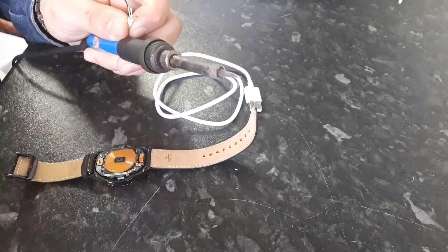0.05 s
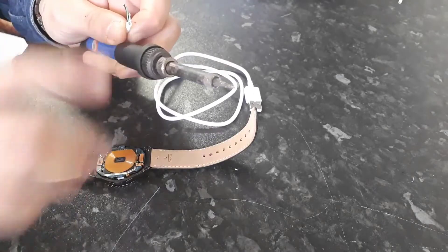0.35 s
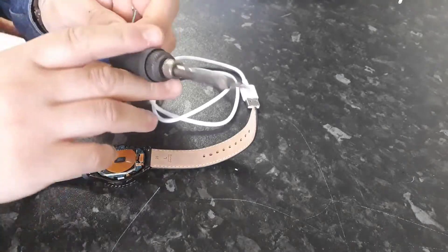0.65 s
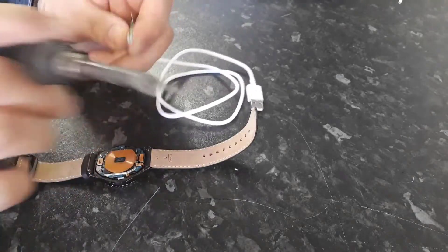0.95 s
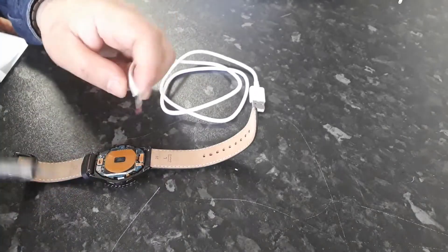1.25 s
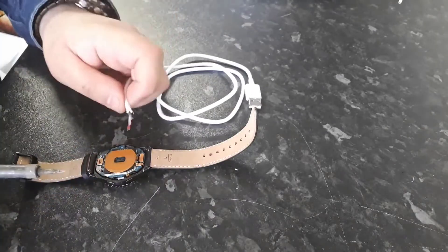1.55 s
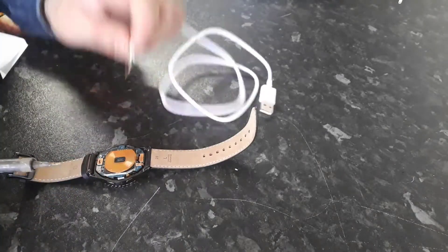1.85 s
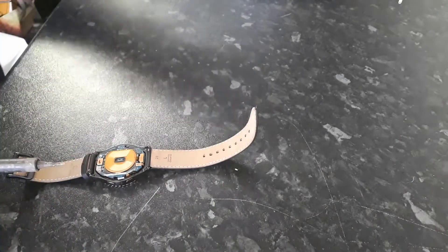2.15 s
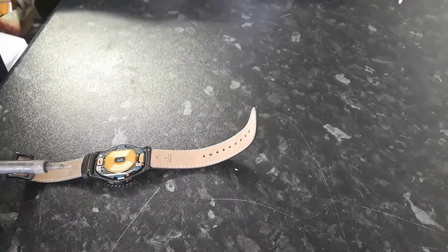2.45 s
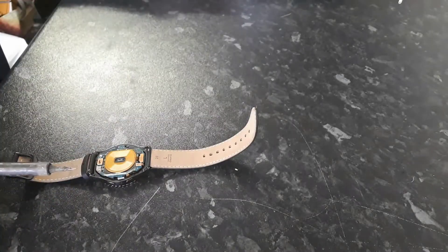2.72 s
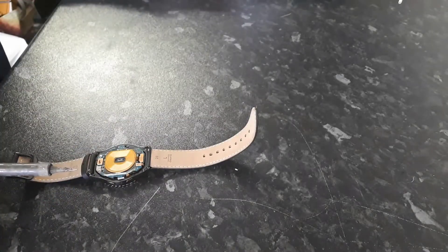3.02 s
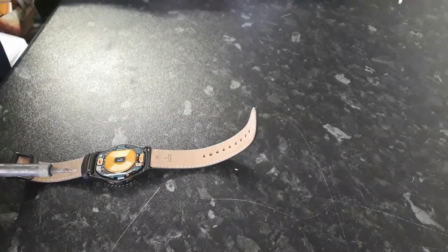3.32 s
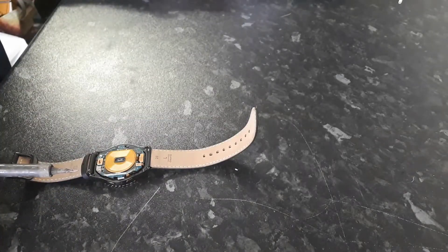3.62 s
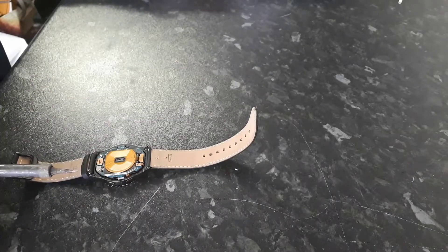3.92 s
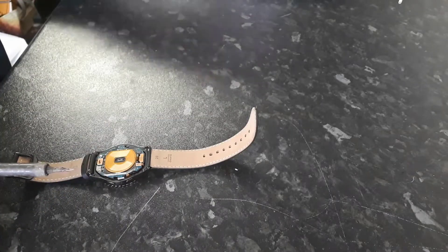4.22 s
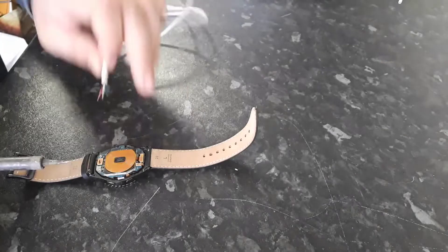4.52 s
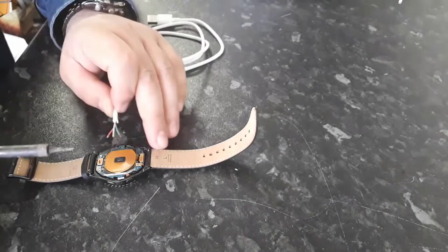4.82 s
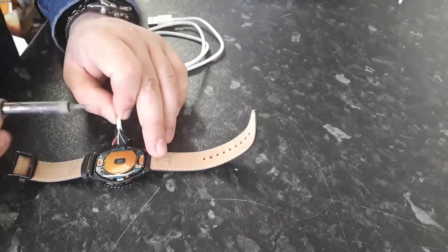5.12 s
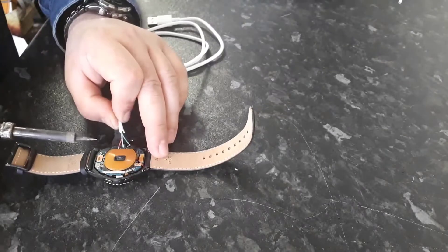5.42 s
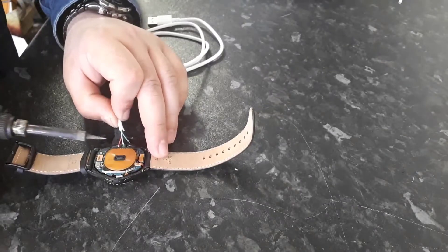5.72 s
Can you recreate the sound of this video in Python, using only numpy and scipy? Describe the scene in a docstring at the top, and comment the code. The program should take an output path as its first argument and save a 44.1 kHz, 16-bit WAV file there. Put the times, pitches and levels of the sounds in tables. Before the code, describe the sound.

A hand tool clacks against a countertop, followed by a cable's brief scrape, plug taps and light rustling in a quiet, humming room.

```python
"""Small tools on a hard countertop in a quiet room. First a hand and tool knock on it, exciting the
modes of top and shaft; then the hand brushes along it. Near 1.8 s a coiled cable slides away by
stick-slip friction, and at 2.2 s it is put down, its plug bouncing in short impacts. From about 4 s it
is picked up with taps, rubs and squeaks, and the hand bumps the top softly. A faint whistle comes and
goes late on; under it all lie room noise, a thin hiss and the harmonic drone of two far engines."""
import sys
import numpy as np
from scipy import signal
from scipy.fft import rfft, irfft
from scipy.io import wavfile

SR = 44100
rng = np.random.default_rng(int(sys.argv[2]) if len(sys.argv) > 2 else 0)


def int16_out(signal):
    """Quantize to a 16-bit WAV file."""
    q = np.round(np.clip(np.atleast_2d(signal).T, -1, 1) * 32767)
    wavfile.write(sys.argv[1], SR, q.astype(np.int16))


N = 258360
TIME = np.arange(N) / SR

# blows: t/s, level/dB, thud/dB, clack/dB, edge/dB, rattle decay/s, contact f/Hz, contact gain/dB
KNOCKS = [(0.126, -24, -12, -10, -18.5, 0.013, 1360, 5.5),
          (0.221, -21, -8.5, -9.5, -10.5, 0.0044, 1320, 4.5),
          (0.253, -14, -5.5, -30, -36.5, 0.0082, 576, 2.5), (0.259, -11.5, -8, -13, -29, 0.01, 1400, 1.5),
          (0.2645, -20, -11, -12, -31.5, 0.0034, 1294, 8.5), (0.3085, -21, -7.5, 1.5, -9, 0.015, 1850, 1.5)]
# spectrum of a knock: f/Hz, level/dB
KNOCK_SPECTRUM = [(60, -35.5), (115, 0.5), (175, -2), (270, 5), (560, -5), (760, -1.5), (1300, -5),
                  (1950, -9), (2350, -15), (3200, -25.5), (4400, -19), (5000, -21), (6000, -26.5),
                  (7600, -27.5), (13000, -33.5), (16000, -43.5)]
# modes of the countertop and what stands on it: f/Hz, level/dB, T60/s
TOP_MODES = [(125, -10, .3), (178, -7, .27), (217, -10, .22), (250, -11, .12), (360, -3.5, .13),
             (495, -9, .06), (545, 0, .09), (619, -5, .06), (705, -11.5, .08), (875, -8, .13),
             (988, -8, .14), (1025, -6, .1), (1290, -7, .09), (1330, -3, .07), (1674, -6, .09),
             (1940, -2, .06), (2470, -7, .07), (4480, 5, .018), (5000, 4, .017), (7600, 4, .015)]
# the knocks lean to the right: f/Hz, left minus right/dB
KNOCK_BALANCE = [(130, -1), (380, -3), (900, -6), (1400, -5), (2000, -4), (2700, -1), (5000, 1),
                 (14000, -1)]
def knocks():
    """Impact excitation: heavy, dull blows of hand and tool set the countertop ringing."""
    return impacts(KNOCKS, KNOCK_SPECTRUM, TOP_MODES, KNOCK_BALANCE,
                   ring_db=8, rattle_db=11, trim_db=[17.4, 13.3, 17.8, 17.7], detune=0)

# hard blows on the tool's metal shaft: t/s, level/dB
SHAFT_STRIKES = [(.2215, -33), (.2592, -43), (.3087, -26)]
# modes of the shaft: f/Hz, level/dB, T60/s
SHAFT_MODES = [(3750, -11, .03), (4450, -11, .035), (5030, 0, .021), (5950, -16, .05), (7400, -16, .07),
               (8150, -14, .04)]
def shaft_ring(left_lag_s=.00003):
    """Free vibration: the struck shaft rings briefly, and the sound reaches the left side later."""
    return np.array([sum(damped_mode(s + lag, hz, db + level, t60)
                         for s, db in SHAFT_STRIKES for hz, level, t60 in SHAFT_MODES)
                     for lag in (left_lag_s, 0)])

# spectrum of the skid: f/Hz, level/dB
SKID_SPECTRUM = [(300, -15.5), (600, -1), (1000, 2), (1700, 4.5), (2100, -4.5), (2700, -14), (3600, -9),
                 (5000, -13), (5700, -16.5), (7500, -14.5), (9000, -19), (13000, -20), (15000, -31.5)]
# resonances of the skidding shaft: f/Hz, width/Hz, gain/dB
SKID_PEAKS = [(3480, 220, 11), (4400, 220, 11), (5030, 150, 8)]
def tool_skid():
    """Sliding friction: after the second knock the tool skids, and its shaft sings faintly."""
    friction = coloured(slips(2500, 1.5), SKID_SPECTRUM, 0.13, SKID_PEAKS)
    return friction * amp(-39.5) * window(0.228, 0.27, 0.0015, 0.0036)

# plug and cable taps: t/s, level/dB, thud/dB, hardness/dB, rattle decay/s, contact f/Hz, contact gain/dB
TAPS = [(2.2147, -55.5, -20, 9, 0.0039, 2500, 0), (2.2177, -42, -13, 4, .003, 3710, -1),
        (2.221, -41.5, 3.5, -23, 0.0024, 1080, 13), (2.228, -26.5, -7, -9, 0.0022, 2160, 2),
        (2.2885, -35.5, -3, 0.5, 0.0054, 3430, -2), (2.296, -48, -5, 2, .002, 3430, -8),
        (2.348, -36, -24, 0, 0.0026, 1430, 5), (2.391, -37.5, -32, -1, 0.0029, 1800, 9),
        (2.399, -43.5, -36, -6.5, 0.004, 1900, 3), (2.575, -40, -18, 0.5, 0.0049, 2500, 0),
        (2.668, -48, -7, -1, 0.0033, 2410, 10.5), (2.712, -48, -4, -8, 0.0089, 815, 9),
        (3.939, -49, -5, -37, 0.0036, 950, 1), (4.16, -51.5, -17.5, -30.5, 0.0095, 1030, 9),
        (4.253, -45, -13, -11.5, 0.0081, 1870, 10), (4.263, -46, -32, -10, 0.0051, 1420, 7),
        (4.348, -48.5, -27, -2, 0.0046, 1380, -4), (4.367, -53, -38, -3, 0.0067, 1810, 11),
        (4.438, -42.5, -27, 0, 0.0034, 1420, 5), (4.468, -38.5, -12, -2, 0.0034, 584, 20),
        (4.49, -33.5, -15.5, 0, 0.0043, 2320, 1), (4.4995, -45.5, -17, 2, 0.0036, 2790, 3),
        (4.507, -48, -29, 0.5, 0.0024, 1600, -6), (4.529, -38.5, -17, -7, 0.0062, 593, 18.5),
        (4.593, -39.5, -20, 0.5, 0.0058, 2180, 3), (4.686, -45, -21, -0.5, 0.0029, 3250, 6),
        (4.691, -47, -17, -2, 0.0023, 2100, 10), (4.697, -55, -20, -0.5, 0.002, 1590, 6),
        (4.711, -51, -15, -4, 0.002, 1750, 5), (4.731, -53.5, -18, -0.5, 0.0017, 2630, 4),
        (4.785, -54.5, -15, -3, 0.0025, 2150, 11), (4.8, -50.5, -34, -6, 0.0098, 973, 14),
        (4.953, -51, 2, -13, 0.0061, 1690, 5)]
# spectrum of a tap: f/Hz, level/dB
TAP_SPECTRUM = [(110, -30), (230, 8), (380, -2.5), (590, -9.5), (730, -4.5), (960, 1), (1180, -4),
                (2100, -4.5), (2650, -5), (3400, -5), (5800, -18), (7600, -18.5), (9600, -29), (13300, -29),
                (16000, -68)]
# modes of the plug on the top, damped by its cable: f/Hz, level/dB, T60/s
PLUG_MODES = [(236, -19, .12), (330, -17, .12), (598, -5, .1), (790, -9, .06), (915, -7, .08),
              (985, -9, .09), (1330, -8, .08), (1460, -3, .06), (1780, -2, .05), (2030, -3, .035),
              (2230, -1, .03), (2480, -3, .025), (2790, -2, .04), (3080, -3, .025), (3400, -2, .025),
              (3720, -3, .035), (4180, -3, .03), (5250, -6, .025), (7630, 0, .018)]
# the taps lie near the middle: f/Hz, left minus right/dB
TAP_BALANCE = [(130, -1), (500, -2), (900, -1.5), (1400, 0), (5000, -1), (14000, -1.5)]
def plug_taps(clack_db=2, clack_per_hardness=0.57, edge_per_hardness=1.92):
    """Contact stiffness: the harder a tap, the brighter it is; the plug lands a new way each time."""
    rows = [(s, db, thud, clack_db + clack_per_hardness * hardness, edge_per_hardness * hardness, *rest)
            for s, db, thud, hardness, *rest in TAPS]
    return impacts(rows, TAP_SPECTRUM, PLUG_MODES, TAP_BALANCE,
                   ring_db=2, rattle_db=10.5, trim_db=[13.9, 13.7, 17.36, 17.03], detune=.02)

# likeness of left and right in rattles and reflections: f/Hz, correlation
SCATTER_CORRELATION = [(150, 0.97), (500, 1), (1000, 0.12), (2000, 0.088), (4000, -0.19), (14000, 0.0069)]
def impacts(rows, spectrum, modes, balance, ring_db, rattle_db, trim_db, detune, size=16384):
    """Superposition: each blow is a click, a dense rattle of parts and a set of damped modes."""
    t, hz, out = np.arange(size) / SR, np.fft.rfftfreq(size, 1 / SR), np.zeros((2, N))
    lowpasses = [1 / (1 + (hz / corner_hz) ** 8) for corner_hz in (450, 1300, 2900)]
    bands = np.diff([0 * hz, *lowpasses, 1 + 0 * hz], axis=0)  # thud, body, clack, edge
    fade = np.clip((.3 - t) / .1, 0, 1)
    lean = np.array([minimum_phase(side * read(balance, hz) / 2) for side in (1, -1)])
    for s, db, thud, clack, edge, rattle_s, contact_hz, contact_db in rows:
        ring = 0
        for f, level, t60 in modes:
            strength_db = level + 2 * rng.standard_normal()  # depends on where the blow lands
            mode_hz = f * rng.normal(1, detune)
            phase = rng.normal(0, min(f / 1200, 1.5), (2, 1))  # short waves arrive out of step
            ring += amp(strength_db - 60 * t / t60) * np.cos(2 * np.pi * mode_hz * t + phase)
        rattle = rng.standard_normal((2, size)) * np.exp(-t / rattle_s) / np.sqrt(SR / 1000)
        click_and_rattle = 1 + amp(rattle_db) * pair(*rfft(rattle), read(SCATTER_CORRELATION, hz))
        contact = resonances([(contact_hz, .13 * contact_hz, contact_db)], hz)
        blow = click_and_rattle + amp(ring_db) * rfft(unit(ring)) / np.sqrt(size)
        blow *= minimum_phase(read(spectrum, hz) + 20 * np.log10(contact))
        # each band gets its share of the blow's energy
        band_energy = bands @ (abs(blow) ** 2).mean(0) / size
        power_gain = amp(np.add([thud, 0, clack, edge], trim_db)) ** 2 / band_energy
        blow *= lean * minimum_phase(10 * np.log10(power_gain @ bands))
        add(out, s, amp(db) * irfft(blow) * fade)
    return out

# the plug's metal shell hits the stone: t/s, level/dB
SHELL_HITS = [(2.2175, -41), (2.2287, -29.5), (2.296, -43), (2.3482, -54), (2.577, -55), (4.441, -46),
              (4.4905, -43), (4.594, -51.5)]
# spectrum of these hits: f/Hz, level/dB
SNAP_SPECTRUM = [(2500, -38), (5500, 5.5), (7800, 3.5), (10000, -8.5), (13000, -0.5), (15500, -12)]
def plug_snaps():
    """Hard contact: metal meets stone so briefly that the crack lies in the high treble."""
    return coloured(white_noise(), SNAP_SPECTRUM, .2) * pulses(SHELL_HITS, rise_s=.00017, fall_s=.0028)

# modes of the top under the landing plug: f/Hz, level/dB, T60/s
LANDING_MODES = [(232, -44, .1), (330, -51, 0.053), (513, -44, 0.054), (783, -41, 0.054), (913, -40, 0.19),
                 (983, -41, 0.12), (1090, -55, 0.044), (1343, -40.5, 0.19), (2000, -27.5, 0.014),
                 (2350, -31.5, .012), (2820, -39.5, 0.11)]
def plug_landing(at_s=2.2285):
    """Modal decay: the top gives a woody ring as the plug comes down flat."""
    return sum(damped_mode(at_s, *mode) for mode in LANDING_MODES) * amp([[-1.5], [1.5]])

# spectrum of the settling coil: f/Hz, level/dB
FLOP_SPECTRUM = [(110, -12), (180, 0), (235, 3.5), (290, 1), (350, -8), (430, -4.5), (560, -3.5), (800, -7),
                 (1000, 2), (1600, -42), (8000, -77)]
def coil_flop():
    """Soft contact: the loops settle on the top with a hollow thud and little treble."""
    return coloured(slips(1500, 1.1), FLOP_SPECTRUM, 0.99) * amp(-40) * window(2.228, 2.245, .002, .014)

# spectrum of the dragging coil: f/Hz, level/dB
COIL_SPECTRUM = [(400, -19.5), (700, -7), (1020, 3), (1180, -1.5), (1380, 3.5), (1700, -3.5), (2200, 3),
                 (2650, -14), (3100, -24), (5500, -38), (7400, -28), (10000, -50), (16000, -44)]
def coil_drag():
    """Static, then kinetic friction: the coil breaks loose with a louder rub and drags on evenly."""
    breakaway_db = 9 * window(0, 1.828, 1, 0.015)
    level_db = -59.5 + breakaway_db + 1.05 * drift(50)
    rub = coloured(slips(5000, 0.98), COIL_SPECTRUM, 0.23)
    return rub * amp(level_db) * window(1.8225, 1.945, 0.04, 0.028)

# spectrum of the sliding plug: f/Hz, level/dB
SCRAPE_SPECTRUM = [(400, -15), (580, -22), (900, -4.5), (1200, -8), (1900, -6), (2450, -6), (3100, -8),
                   (3700, -10), (4700, -15), (5600, -23.5), (6300, -21), (6800, -23), (7400, -14),
                   (8800, -14.5), (10000, -19), (12500, -28), (14800, -24), (15800, -48)]
# its resonances: f/Hz, width/Hz, gain/dB
SCRAPE_PEAKS = [(950, 120, 4), (1450, 80, 9), (2140, 90, 13), (3660, 120, 5), (7550, 200, 6),
                (8030, 220, 5)]
def plug_scrape(chatter_hz=450):
    """Stick-slip motion: the plug catches and lets go unevenly on the fine texture of the top."""
    cycles = np.cumsum(chatter_hz * np.exp(0.46 * drift(180))) / SR
    chatter = white_noise() * (.16 + np.exp(-(cycles % 1) / .17))  # one burst per slip
    envelope = amp(-42.8 + .7 * drift(120)) * window(1.951, 2.029, 0.004, 0.002)
    return coloured(chatter, SCRAPE_SPECTRUM, 0.055, SCRAPE_PEAKS) * envelope

# light touches of the plug: t/s, level/dB
GRAZES = [(1.86, -70), (1.898, -62.5), (1.911, -58.5), (1.927, -69), (1.938, -52)]
# spectrum of a graze: f/Hz, level/dB
GRAZE_SPECTRUM = [(900, -6), (2200, 0), (3600, -4), (5200, -13), (6500, -5), (7500, 1), (8600, -6),
                  (10500, -19), (15000, -28)]
def plug_grazes():
    """Glancing contact: before it slides, the plug grazes the stone with faint hisses."""
    return coloured(white_noise(), GRAZE_SPECTRUM, 0.14) * pulses(GRAZES, rise_s=.003, fall_s=.005)

# hand and sleeve brush the top: t/s, rise and decay/s, rub level/dB, skin hiss level/dB
BRUSHES = [(.53, 0.29, -68.5, -89), (.99, 0.049, -71.5, -104), (1.07, 0.11, -69.5, -80.5),
           (1.48, 0.084, -73, -86), (5.0, 0.067, -68.5, -75.5), (5.17, .2, -87, -90),
           (5.35, 0.096, -79, -85)]
# spectrum of the brushing: f/Hz, level/dB
BRUSH_SPECTRUM = [(300, -13.5), (600, -6.5), (850, 4), (1140, 3.5), (1400, -3.5), (1600, -9), (1900, -8),
                  (2400, -12), (3200, -20), (6000, -32), (16000, -49)]
# fingers stroke the wire: t/s, rise and decay/s, rub level/dB, skin hiss level/dB
WIRE_STROKES = [(4.36, 0.12, -67.5, -92), (4.45, 0.017, -74, -85), (4.514, 0.011, -43, -67),
                (4.66, 0.0066, -64, -83), (4.725, 0.023, -54.5, -72), (4.82, 0.067, -61, -99)]
# spectrum of the gripped wire: f/Hz, level/dB
WIRE_SPECTRUM = [(330, -18), (480, -5), (740, -12), (1020, 9), (1400, 1.5), (1800, 0.5), (2200, -2),
                 (2950, -2), (3600, -15), (5500, -21), (7500, -39), (10000, -47), (16000, -53.5)]
# plug resonances woken by the wire: f/Hz, width/Hz, gain/dB
PLUG_PEAKS = [(590, 80, 12), (991, 80, 7), (1650, 200, 4), (2170, 200, 4), (3150, 250, 3), (4210, 200, 5)]
# spectrum of the wire's sheath sliding through the fingertips: f/Hz, level/dB
SHEATH_SPECTRUM = [(700, -22), (1000, -3), (1400, -3), (2000, -2), (2600, -1), (3000, -5), (3500, -19),
                   (8000, -32)]
def fingers():
    """Friction noise: dense slips make a soft brushing, sparse ones the fine rattle of the wire."""
    brush = coloured(slips(2700, 1.8), BRUSH_SPECTRUM, 0.1)
    rattle = coloured(slips(600, 2.5), WIRE_SPECTRUM, 0.1, PLUG_PEAKS)
    sheath = coloured(slips(2500, 3.3), SHEATH_SPECTRUM, 0.1)
    sheath *= amp(-69) * window(4.8, 4.875, 0.012, 0.0091)
    return strokes(BRUSHES, brush) + strokes(WIRE_STROKES, rattle) + sheath

# spectrum of sliding skin: f/Hz, level/dB
SKIN_SPECTRUM = [(2000, -14.5), (4000, -7.5), (5700, -14), (6600, -1), (7600, 0.5), (8200, -12.5),
                 (9600, -11), (16000, -24)]
def strokes(rows, rub):
    """Amplitude modulation: the rub and the hiss of skin swell and fade with each uneven touch."""
    times, fades, rub_db, hiss_db = np.transpose(rows)
    touch = np.array([window(s, s, fade, fade) for s, fade in zip(times, fades)]) * amp(drift(35))
    skin = coloured(slips(4000, 2.4), SKIN_SPECTRUM, 0.1)
    return rub * (amp(rub_db) @ touch) + skin * (amp(hiss_db) @ touch)

# squeaks of the dragged sheath: t/s, rise and decay/s, f/Hz, glide/(octaves per s), level/dB
SQUEAKS = [(4.261, 0.01, 1886, -2, -59), (4.385, 0.013, 1603, -6, -57.5), (4.456, 0.0077, 1394, -4.5, -53)]
def cable_squeaks(width_hz=240):
    """Friction-driven resonance: a hoarse, narrow band falls in pitch as the grip relaxes."""
    out = np.zeros((2, N))
    rasp = np.array([drift(width_hz) + 1j * drift(width_hz) for _ in range(2)])
    for s, fade_s, hz, glide, db in SQUEAKS:
        cycles = np.cumsum(hz * 2 ** (glide * np.clip(TIME - s, -.1, .1))) / SR
        out += amp(db) * window(s, s, fade_s, fade_s) * (rasp * np.exp(2j * np.pi * cycles)).real
    return out

# the heel of the hand comes down: t/s, level/dB
BUMPS = [(0.521, -57.5), (4.954, -54), (5.34, -53.5)]
# spectrum of the top under the hand: f/Hz, level/dB
BUMP_SPECTRUM = [(90, -13), (170, 7), (280, -11), (420, -10.5), (700, -30.5), (1400, -24.5), (3000, -48),
                 (8000, -71)]
def hand_bumps():
    """Cushioned impact: the soft hand excites mainly the low frequencies of the top."""
    return coloured(white_noise(), BUMP_SPECTRUM, 1.0) * pulses(BUMPS, rise_s=0.015, fall_s=0.055)

# reverberation time of the small room: f/Hz, T60/s
ROOM_T60 = [(100, 0.42), (300, 0.47), (1000, 0.35), (3000, 0.22), (8000, 0.43), (15000, 0.14)]
def in_room(direct, early_db, early_s, tail_db, dull_hz, size=22050):
    """Reverberation: the direct sound is followed by close reflections and a short diffuse tail."""
    t, hz = np.arange(size) / SR, np.fft.rfftfreq(size, 1 / SR)
    early = rng.standard_normal((2, size)) * (rng.random((2, size)) < 1500 / SR)
    early *= (t > .002) * np.exp(-t / early_s)
    band_hz, frame_s, noise = signal.stft(rng.standard_normal((2, size)), SR, nperseg=256)
    decay = amp(-60 * frame_s / read(ROOM_T60, band_hz)[:, None])
    tail = signal.istft(noise * decay, SR, nperseg=256)[1][:, :size] * (1 - np.exp(-t / 0.01))
    response = (amp(early_db) * unit(early) + amp(tail_db) * unit(tail)) / np.sqrt(size)
    treble_loss = 1 / np.sqrt(1 + (hz / dull_hz) ** 2)
    response = irfft(pair(*rfft(response), read(SCATTER_CORRELATION, hz)) * treble_loss, size)
    return direct + signal.fftconvolve(direct, response * (t < .45), axes=1)[:, :N]

# faint, thin notes: t/s, f/Hz, level/dB
WHISTLES = [(3.77, 2970, -82), (4.11, 2960, -84.5), (5.32, 2940, -80.5), (5.469, 2940, -81.5)]
def whistles(half_length_s=.05, waver=.022):
    """Frequency modulation: short, soft tones waver at random, barely above the room air."""
    warped_time = np.cumsum(1 + waver * drift(90)) / SR
    return sum(amp(db) * np.exp(-((TIME - s) / half_length_s) ** 2)
               * np.sin(2 * np.pi * hz * warped_time) for s, hz, db in WHISTLES)

# harmonics of the accelerating engine: order, level/dB
PASSING_ORDERS = [(3, 2.5), (4, -11.5), (8, -6.5), (12, -15)]
# harmonics of the idling engine: order, level/dB
IDLE_ORDERS = [(2, -4.5), (3, -2), (4, -4.5), (5, -8), (6, -10), (8, -13.5)]
def traffic(passing, idling, low_hz=18.2, top_hz=22.1, climb_hz_per_s=2.9, idle_hz=26.43):
    """Pitch follows rotation rate: one far engine speeds up and fades while another idles."""
    rate_hz = np.clip(low_hz + climb_hz_per_s * (TIME - 0.62), low_hz, top_hz)
    climb = engine(rate_hz, PASSING_ORDERS, waver=0.0086, flutter_db=2.0) * amp(-54) * passing
    idle = engine(idle_hz, IDLE_ORDERS, waver=0.0077, flutter_db=4.5) * amp(-60.5 + 10 * idling)
    return climb + idle

def engine(rate_hz, orders, waver, flutter_db):
    """Harmonic series: low multiples of the engine's rate, each wavering in strength; rms 1."""
    turns = np.cumsum(rate_hz * (1 + waver * drift(4.5))) / SR
    return unit(sum(amp(db + flutter_db * drift(1.9)) * np.sin(2 * np.pi * (k * turns + rng.random()))
                    for k, db in orders))

# spectrum of the room air: f/Hz, level/dB
AIR_SPECTRUM = [(18, -35), (40, -14.5), (58, -2.5), (95, -1), (135, -9), (200, -8.5), (300, -16),
                (420, -26), (620, -33.5), (1000, -32.5), (1900, -37.5), (4000, -47), (9500, -53),
                (12000, -54), (14300, -60.5), (16000, -73.5)]
# its likeness in left and right: f/Hz, correlation
AIR_CORRELATION = [(50, 0.98), (150, 1), (400, 0.17), (1000, 0.075), (3000, 0.073), (14000, 0.062)]
# resonances of its whirr: f/Hz, width/Hz, gain/dB
AIR_PEAKS = [(746, 34, 8.3), (919, 87, 13.5), (1820, 150, 3), (2352, 89, 11), (2970, 200, 3),
             (7340, 610, 3.7)]
def room_air(passing, idling):
    """Ambient noise: narrow resonances give a steady whirr; the rumble swells with the engines."""
    hz = np.fft.rfftfreq(N, 1 / SR)
    noise = amp(-56) * coloured(white_noise(), AIR_SPECTRUM, read(AIR_CORRELATION, hz))
    spectrum = rfft(noise) * resonances(AIR_PEAKS, hz)
    rumble = irfft(spectrum / (1 + (hz / 450) ** 4), N)
    swell_db = -3.5 + 4.5 * passing + 3 * idling + 1.93 * drift(1.2)
    return irfft(spectrum, N) + rumble * (amp(swell_db) - 1)

# spectrum of the thin hiss: f/Hz, level/dB
HISS_SPECTRUM = [(12000, -50), (12900, -20), (13200, -4), (13450, -4), (13620, 2), (13800, -3), (14100, -4),
                 (14400, -11), (14800, -40)]
def hiss():
    """Narrow-band noise: a faint, steady hiss at the top of the treble."""
    return amp(-89.5) * coloured(white_noise(), HISS_SPECTRUM, .5)

def background():
    """Common modulation: the room's rumble and the far traffic follow the same two slow swells."""
    passing = window(1.2, 2.3, rise_s=1.0, fall_s=0.49)
    idling = window(4.96, 5.7, rise_s=0.41, fall_s=0.41)
    return (room_air(passing, idling) + traffic(passing, idling)) * amp([[-.8], [.8]])

def amp(db):
    """Decibels to amplitude ratio."""
    return 10 ** (np.asarray(db) / 20)

def unit(x):
    """Normalisation to rms 1."""
    return x / np.sqrt(np.mean(x ** 2) + 1e-20)

def read(points, hz):
    """Interpolation of a table on a log-frequency axis."""
    f, value = np.transpose(points)
    return np.interp(np.log(hz + 1), np.log(f + 1), value)

def add(mix, s, sound):
    """Superposition of a stereo sound on the mix at time s."""
    part = mix[:, max(round(s * SR), 0):][:, :sound.shape[1]]
    part += sound[:, :part.shape[1]]

def window(start, end, rise_s, fall_s):
    """Exponential growth until start, exponential decay after end."""
    return np.exp(-np.maximum(start - TIME, 0) / rise_s - np.maximum(TIME - end, 0) / fall_s)

def pulses(rows, rise_s, fall_s):
    """Envelope of brief contacts: one exponential peak for each time and level."""
    return sum(amp(db) * window(s, s, rise_s, fall_s) for s, db in rows)

def damped_mode(s, hz, db, t60):
    """A damped oscillator, struck at time s."""
    t = np.maximum(TIME - s, 0)
    return amp(db - 60 * t / t60) * np.sin(2 * np.pi * hz * t)

def white_noise():
    """Two uncorrelated channels of Gaussian noise."""
    return rng.standard_normal((2, N))

def slips(per_s, spread_db):
    """Friction as a Poisson train of tiny slips of uneven size."""
    sizes = amp(spread_db * np.minimum(rng.exponential(1, N), 4))
    return white_noise() * sizes * (rng.random(N) < per_s / SR)

def drift(rate_hz):
    """Low-pass noise: a random wander, rms 1."""
    hz = np.fft.rfftfreq(N, 1 / SR)
    return unit(irfft(rfft(rng.standard_normal(N)) * np.exp(-(hz / rate_hz) ** 2), N))

def resonances(peaks, hz):
    """Gain of bell-shaped resonances on a flat spectrum."""
    return amp(sum(db / (1 + (2 * (hz - f) / width) ** 2) for f, width, db in peaks))

def minimum_phase(gain_db):
    """Causality: a response with this gain that rings after a blow, never before."""
    log_gain = np.log(amp(np.maximum(gain_db, -100)))
    mirrored = np.concatenate([log_gain, log_gain[-2:0:-1]])
    return np.exp(np.conj(signal.hilbert(mirrored)))[:len(log_gain)]

def pair(a, b, correlation):
    """Partial coherence: two channels share a part of their sound."""
    c = np.clip(correlation, -1, 1)
    return np.array([a, c * a + np.sqrt(1 - c ** 2) * b])

def coloured(drive, spectrum, correlation, peaks=()):
    """Source and filter: two drives become a stereo sound of this spectral shape, rms 1."""
    hz = np.fft.rfftfreq(N, 1 / SR)
    response = minimum_phase(read(spectrum, hz) + 20 * np.log10(resonances(peaks, hz)))
    return unit(irfft(pair(*rfft(drive), correlation) * response, N))

# the cable is put down on the right and picked up further left: t/s, left minus right/dB
CABLE_BALANCE = [(2.7, -.7), (4.2, 2)]
def scene():
    """Direct-to-reverberant ratio: the near knocks are drier than the farther cable sounds."""
    pan = amp(np.interp(TIME, *np.transpose(CABLE_BALANCE)) * [[.5], [-.5]])
    near = knocks() + tool_skid()
    far = (plug_taps() + plug_snaps() + coil_flop() + fingers() + cable_squeaks()) * pan + hand_bumps()
    slide = coil_drag() + plug_scrape() + plug_grazes()
    near = in_room(near, early_db=-10, early_s=0.021, tail_db=-19.5, dull_hz=14000)
    far = in_room(far, early_db=-6.5, early_s=0.015, tail_db=-10.5, dull_hz=7500)
    slide = in_room(slide, early_db=-8, early_s=0.011, tail_db=-16, dull_hz=4500)
    return near + shaft_ring() + far + plug_landing() + slide + whistles() + hiss() + background()

def record(dry):
    """Band limiting: a linear-phase low-pass at 15.9 kHz."""
    lowpass = signal.firwin(511, 15900, window=("kaiser", 9), fs=SR)
    return signal.oaconvolve(dry, lowpass[None], "same")

dry = scene()
out = record(dry)
int16_out(out)
```